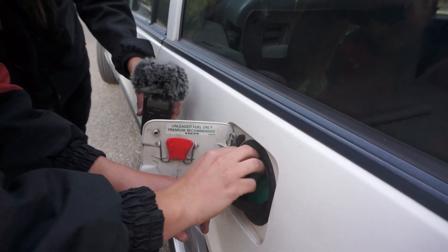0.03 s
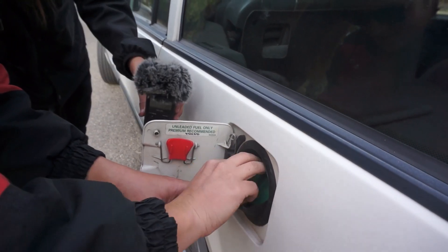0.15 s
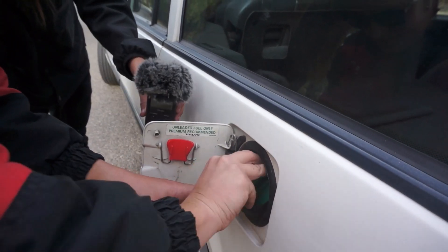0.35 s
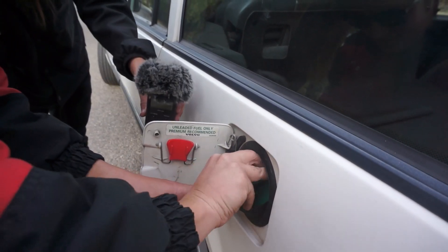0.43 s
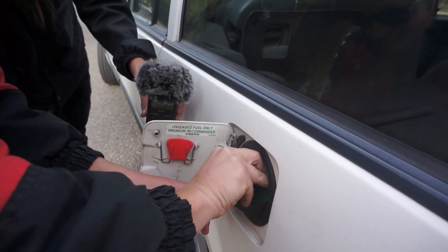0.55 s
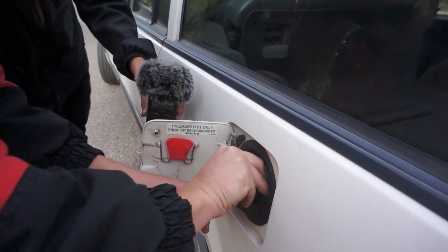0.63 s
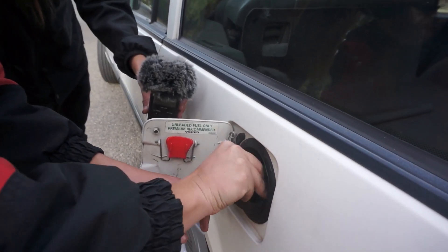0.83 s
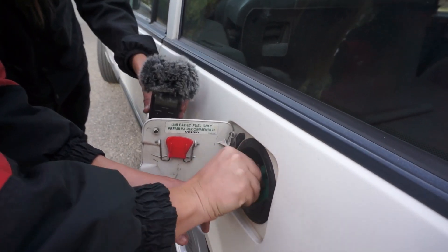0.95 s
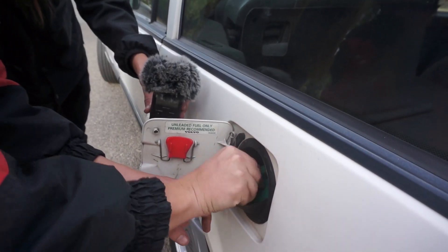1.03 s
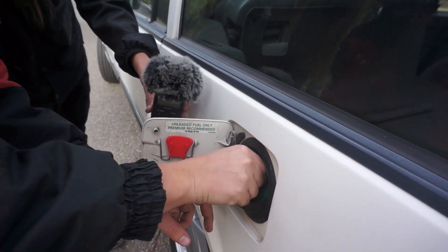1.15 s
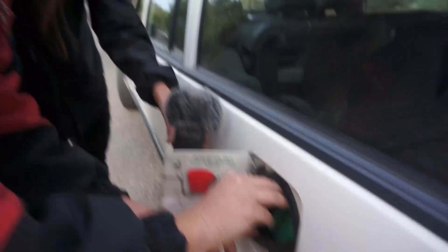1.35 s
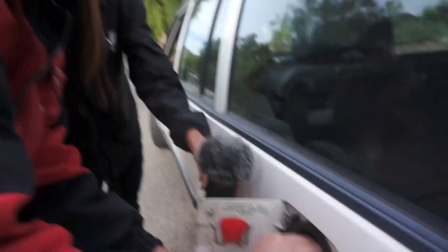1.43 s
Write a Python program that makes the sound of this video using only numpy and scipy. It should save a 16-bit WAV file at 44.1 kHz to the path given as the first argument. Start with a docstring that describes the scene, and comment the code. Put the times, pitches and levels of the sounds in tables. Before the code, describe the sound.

Close to the microphone, a hand turns a car's plastic fuel cap, which scrapes along its thread and clunks unevenly, pauses briefly, then clunks again. A sleeve brushes faintly past, with quiet outdoor air and low rumble behind.

```python
"""Fuel cap twisted by hand

Outdoors beside a parked car, the microphone close to the filler neck, the plastic cap a little to the
right. The cap knocks on its thread and scrapes along it, its lugs snag and spring free, and the heavier
clunks shake the neck and body panel. Fingers tick on the plastic; hand and sleeve brush past.
Behind it lie a low, uneven rumble, quiet outdoor air and a faint hiss."""
import sys
import numpy as np
from scipy import signal
from scipy.fft import rfft, irfft
from scipy.io import wavfile

SR = 44100
rng = np.random.default_rng(int(sys.argv[2]) if len(sys.argv) > 2 else 0)


def digitize_waveform(pressure):
    """Quantize a signal to 16-bit integers and store it at the path in sys.argv[1].

    Rows of a 2-D input are taken as channels; values are limited to [-1, 1].
    """
    field = np.atleast_2d(pressure).T
    bounded = np.clip(field, -1, 1)
    quanta = np.round(bounded * 32767).astype(np.int16)
    wavfile.write(sys.argv[1], SR, quanta)


N = 66150
TIME = np.arange(N) / SR

# spectra of the outdoor background: (frequency [Hz], relative level [dB])
RUMBLE_SPECTRUM = [(20, -2), (45, -0.5), (115, -2), (170, -11), (290, -17), (600, -60), (2000, -56)]
AIR_SPECTRUM = [(100, 4), (550, -2), (850, -18), (1300, -15), (2500, -21.5), (16000, -55)]
HISS_SPECTRUM = [(100, 6.5), (1500, -1), (4000, -1), (8000, -1.5), (13000, 0.5), (16000, -6.5)]
# rise and fall of rumble and hiss: (time [s], level [dB])
RUMBLE_CURVE = [(0, -38.5), (.3, -35), (.72, -37.5), (.85, -41.5), (1.32, -40.5), (1.4, -35), (1.5, -34.5)]
HISS_CURVE = [(.25, -50), (.6, -47.5), (.77, -53.5), (.9, -48), (1.2, -48), (1.35, -47.5)]
# hand and sleeve brushing past: (time of peak [s], level [dB])
BRUSH_SWELLS = [(.505, -49), (.615, -51), (1.15, -50), (1.28, -45)]
# fingers on the plastic: (time [s], level [dB], lower edge [Hz], upper edge [Hz])
FINGER_TICKS = [(0.2495, -37, 2340, 7700), (0.715, -30, 1100, 5800), (0.723, -35, 900, 13400)]
# friction in the thread: (time [s], grinding level [dB], rasp level [dB])
FRICTION_CURVE = [(.19, -58, -74), (.29, -41, -54), (.375, -54.5, -49.5), (.4, -23, -46), (.445, -22, -45),
                  (.485, -48.5, -61), (.53, -14, -40), (.575, -33.5, -49), (.62, -29.5, -40.5),
                  (.66, -23.5, -38.5), (.695, -32, -57), (.77, -61.5, -72.5), (.915, -63, -56),
                  (.932, -21.5, -35.5), (.962, -20.5, -32.5), (1.02, -37, -89), (1.1, -43, -55),
                  (1.3, -55, -58)]
# resonances of grinding neck, rasping thread and hard plastic: (frequency [Hz], width [Hz], gain [dB])
GRIND_BANDS = [(100.6, 101, -1), (263, 67, 0), (422.5, 46.4, 1.5), (611.3, 32, -0.5), (719, 50, -1.5),
               (806, 54, 0.5), (954, 98, -5.5), (1757, 77, -9.5)]
RASP_BANDS = [(3250, 1400, 11.5), (5590, 110, 13), (6300, 3500, -3)]
PLASTIC_BANDS = [(1753, 175, 7.5), (2590, 450, 1), (3097, 234, 5), (4170, 550, 1), (5720, 480, -2),
                 (7160, 950, -8), (11800, 6600, -12.5)]
# lugs springing free: (time [s], level [dB], favoured pitch [Hz])
LUG_SNAGS = [(0.405, -23.5, 4570), (0.4319, -27.5, 4360), (0.52, -29, 3300), (0.6724, -32, 4050),
             (0.9664, -21.5, 5380)]
# the cap knocking on its thread:
# (time [s], knock level [dB], pitch [Hz], push on the car body [dB], crack level [dB], crack top [Hz])
CAP_KNOCKS = [(0.0315, -30.5, 1030, -32, -22.5, 3570), (0.2145, -11.5, 887, -18.5, -17.5, 3090),
              (.221, -31, 255, -28, -57, 2520), (0.272, -21.5, 793, -25.5, -55, 2580),
              (.406, -10.5, 970, -5, -11, 5200), (0.4132, -17.5, 418, -30, -44, 4050),
              (0.4325, -9, 1070, -3, -12, 4350), (.519, -3.5, 946, 2.5, 0, 6600),
              (0.5249, -12.5, 351, -16, -5.5, 3030), (0.5389, -16.5, 353, -30, -24, 3700),
              (0.6301, -11, 800, -11, -13.5, 3770), (0.666, -15.5, 930, -37, -32, 2790),
              (0.6705, -3.5, 883, -7, -9, 3500), (0.9659, -1, 852, -13, -8.5, 8060),
              (.977, -6.5, 770, -19.5, -10, 12900), (0.9979, -5, 840, -15, -14.5, 5350),
              (1.0410, -14.5, 880, -20.5, -31, 2200), (1.0613, -16, 816, -19.5, -23, 2740),
              (1.1222, -19, 864, -24, -36, 2960), (1.259, -31.5, 840, -30, -34, 1950),
              (1.3698, -27, 390, -31, -55, 13700)]
# ringing of the cap and its recess: (frequency [Hz], level [dB], t60 [s])
CAP_RING = [(625, -21.5, 0.053), (794, -13, 0.038), (814.5, -12.5, 0.045), (1206, -18.5, 0.037),
            (1646, -24.5, 0.038)]
# ringing of the filler neck and body panel: (frequency [Hz], level [dB], t60 [s])
BODY_RING = [(104.3, -17, 0.24), (267.5, -22.5, 0.2), (320, -16, 0.096), (374.6, -15.5, 0.07),
             (423.6, -18.5, 0.16), (511.4, -26, 0.26), (739, -10.5, 0.022), (1789.5, -17, 0.045)]

LUG_MODES_HZ, LUG_T60_S, SNAG_FOCUS_DB_PER_OCTAVE = [3170, 4170, 4630, 5380], 0.034, 74
AIR_DB, OUTDOOR_SIDE_DB, HISS_SIDE_DB = -50, -17, 1
ECHO_DB, ECHO_SIDE_DB, ECHO_T60_S, ECHO_DELAY_S = -14, -7.5, 0.039, 0.0029
BRUSH_HALF_LENGTH_S, BRUSH_HZ, BRUSH_WIDTH_HZ = 0.051, 13000, 15000
SLIPS_PER_S, SLIP_SPREAD_DB = 2500, 4
GRIND_BOTTOM_HZ, GRIND_TOP_HZ = 70, 1425
CRACK_DB, CRACK_T60_S, SNAP_DB = -2, 0.016, 9
# a knock lasts about four cycles when its crack reaches 3 kHz; harder contacts are shorter
KNOCK_CYCLES, KNOCK_TOP_HZ, KNOCK_SHORTENING = 3.83, 2900, 0.63
# as heard from the microphone: right channel over left
CAP_RIGHT_DB, BODY_RIGHT_DB, PLASTIC_RIGHT_DB, LEFT_LAG_S = 3, 4, 7, 0.00014
CUTOFF_HZ = 16300


def from_db(db):
    """Decibels to gain."""
    return 10 ** (np.asarray(db) / 20)


def rms_one(x):
    """Scale to unit rms."""
    return x / np.sqrt(np.mean(x ** 2) + 1e-20)


def in_time(rows):
    """Each column of a curve, sample by sample."""
    times, *columns = np.transpose(rows)
    return [np.interp(TIME, times, column) for column in columns]


def add(out, start, sound):
    """Mix a sound in at a given time."""
    at = int(round(start * SR))
    out[at:at + len(sound)] += sound[:N - at]


def clicks(times, levels_db):
    """Single impulses at the given times and levels."""
    out = np.zeros(N)
    for start, db in zip(times, levels_db):
        add(out, start, from_db([db]))
    return out


def cut(x, hz, kind, order=2):
    """Low- or high-pass."""
    return signal.sosfilt(signal.butter(order, hz, kind, fs=SR, output="sos"), x)


def resonate(x, hz, width):
    """One resonance with gain 1 at its top."""
    radius = np.exp(-np.pi * width / SR)
    feedback = [1, -2 * radius * np.cos(2 * np.pi * hz / SR), radius ** 2]
    return signal.lfilter(np.array([1, 0, -1]) * (1 - radius ** 2) / 2, feedback, x)


def resonances(x, bands):
    """Parallel resonances of alternating sign."""
    return sum((-1) ** k * from_db(db) * resonate(x, hz, width)
               for k, (hz, width, db) in enumerate(bands))


def ring(x, modes):
    """Every impulse sets the modes ringing as dying sines."""
    response = sum((-1) ** k * from_db(db - 60 * TIME / t60) * np.sin(2 * np.pi * hz * TIME)
                   for k, (hz, db, t60) in enumerate(modes))
    return signal.fftconvolve(x, response)[:N]


def dying_noise(t60):
    """A burst of noise that falls 60 dB in t60 seconds."""
    return rng.standard_normal(N) * from_db(-60 * TIME / t60)


def mid_side(mid, side, side_db):
    """Mid and side to left and right."""
    return mid + from_db(side_db) * np.array([side, -side])


def stereo_noise(spectrum, side_db):
    """Steady coloured noise in two channels, rms 1."""
    hz, db = np.transpose(spectrum)
    freqs = np.maximum(np.fft.rfftfreq(N, 1 / SR), 1)
    colour = from_db(np.interp(np.log(freqs), np.log(hz), db))
    mid, side = irfft(rfft(rng.standard_normal((2, N))) * colour, N)
    return rms_one(mid_side(mid, side, side_db))


def place(x, right_db):
    """A source right of the microphone is louder in the right channel and later in the left."""
    late = np.pad(x, (round(LEFT_LAG_S * SR), 0))[:N]
    return np.array([from_db(-right_db / 2) * late, from_db(right_db / 2) * x])


def outdoors():
    """Around the car: uneven rumble and steady air near the centre, and a wide, faint hiss."""
    rumble_db, = in_time(RUMBLE_CURVE)
    hiss_db, = in_time(HISS_CURVE)
    rumble = from_db(rumble_db) * stereo_noise(RUMBLE_SPECTRUM, OUTDOOR_SIDE_DB)
    air = from_db(AIR_DB) * stereo_noise(AIR_SPECTRUM, OUTDOOR_SIDE_DB)
    hiss = from_db(hiss_db) * stereo_noise(HISS_SPECTRUM, HISS_SIDE_DB)
    return rumble + air + hiss


def reflections(x):
    """A brief scatter off the flap, the car's side and the ground, partly different left and right."""
    scatters = [dying_noise(ECHO_T60_S) * (TIME > ECHO_DELAY_S) for _ in range(2)]
    mid, side = [signal.fftconvolve(x, scatter / np.linalg.norm(scatter))[:N] for scatter in scatters]
    return from_db(ECHO_DB) * mid_side(mid, side, ECHO_SIDE_DB)


def sleeve_brushes():
    """Skin and cloth slide near the microphone in airy swells, different in each channel."""
    swells = sum(from_db(db) * np.exp(-((TIME - peak) / BRUSH_HALF_LENGTH_S) ** 2)
                 for peak, db in BRUSH_SWELLS)
    return swells * rms_one(resonate(rng.standard_normal((2, N)), BRUSH_HZ, BRUSH_WIDTH_HZ))


def finger_ticks():
    """Tiny clicks straight ahead of the microphone, too light to set the cap ringing."""
    out = np.zeros(N)
    for start, db, low_hz, top_hz in FINGER_TICKS:
        burst = dying_noise(t60=0.014)[:SR // 20]
        add(out, start, from_db(db) * cut(cut(burst, low_hz, "high"), top_hz, "low"))
    return out


def slips():
    """Friction as dense, tiny slips of uneven size."""
    sizes = from_db(SLIP_SPREAD_DB * np.minimum(rng.exponential(1, N), 4))
    signs = rng.choice([-1, 1], N)
    return sizes * signs * (rng.random(N) < SLIPS_PER_S / SR)


def thread_scrape():
    """The thread slips as the cap turns: grinding in the neck and a plastic rasp with a thin squeak."""
    grind_db, rasp_db = in_time(FRICTION_CURVE)
    grind = resonances(slips(), GRIND_BANDS)
    grind = cut(cut(grind, GRIND_TOP_HZ, "low", order=4), GRIND_BOTTOM_HZ, "high")
    rasp = resonances(slips(), RASP_BANDS)
    return place(from_db(grind_db) * rms_one(grind) + from_db(rasp_db) * rms_one(rasp), CAP_RIGHT_DB)


def lug_snags():
    """A stiff lug springs free and rings briefly; where it was caught decides which modes ring most."""
    out = np.zeros(N)
    for start, db, favoured_hz in LUG_SNAGS:
        modes = [(hz, -SNAG_FOCUS_DB_PER_OCTAVE * abs(np.log2(hz / favoured_hz)), LUG_T60_S)
                 for hz in LUG_MODES_HZ]
        out += ring(clicks([start], [db]), modes)
    return place(out, PLASTIC_RIGHT_DB)


def cap_knocks():
    """Each contact knocks hollowly, rings cap and car body, and cracks brighter the harder it is."""
    hollow, cracks = np.zeros(N), np.zeros(N)
    length = SR // 8
    snap = from_db(SNAP_DB) * signal.unit_impulse(length)
    for start, db, hz, _, crack_db, top_hz in CAP_KNOCKS:
        cycles = KNOCK_CYCLES * (KNOCK_TOP_HZ / top_hz) ** KNOCK_SHORTENING
        elapsed_cycles = hz * TIME[:length]
        envelope = np.sin(np.pi * np.minimum(elapsed_cycles / cycles, 1))
        add(hollow, start, -from_db(db) * envelope * np.sin(2 * np.pi * elapsed_cycles))
        chatter = from_db(CRACK_DB) * dying_noise(CRACK_T60_S)[:length]
        crack = cut(resonances(snap + chatter, PLASTIC_BANDS), top_hz, "low")
        add(cracks, start, from_db(crack_db) * crack)
    times, knock_db, _, push_db, _, _ = np.transpose(CAP_KNOCKS)
    cap = hollow + ring(clicks(times, knock_db), CAP_RING)
    body = ring(clicks(times, push_db), BODY_RING)
    return place(cap, CAP_RIGHT_DB) + place(body, BODY_RIGHT_DB) + place(cracks, PLASTIC_RIGHT_DB)


def scene():
    """The cap close up and a little to the right, over the outdoor background."""
    close = cap_knocks() + lug_snags() + thread_scrape() + finger_ticks()
    return close + reflections(close[1]) + sleeve_brushes() + outdoors()


def record(dry):
    """After the microphone, the highest peaks are rounded and the top treble is cut steeply."""
    rounded = dry / (1 + dry ** 6) ** (1 / 6)
    return signal.sosfilt(signal.ellip(10, .1, 80, CUTOFF_HZ, fs=SR, output="sos"), rounded)


dry = scene()
out = record(dry)
digitize_waveform(out)
```